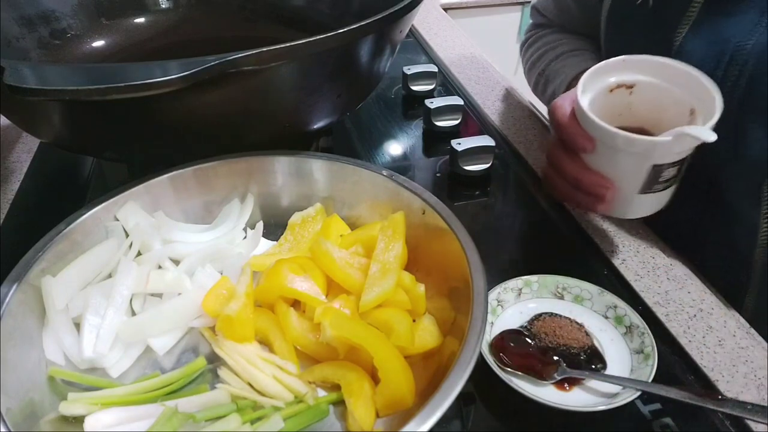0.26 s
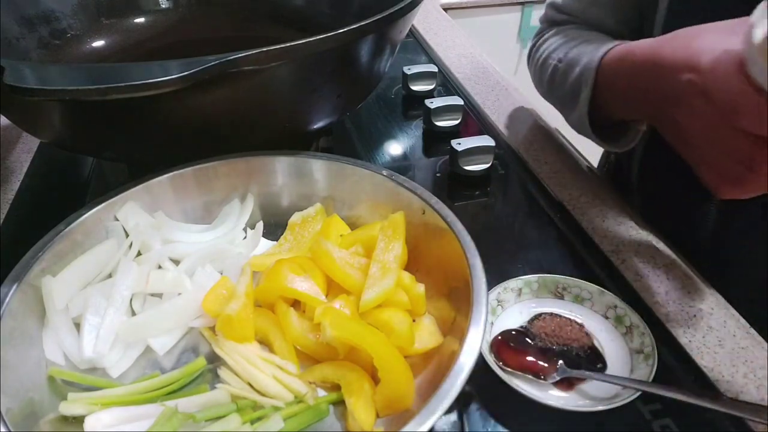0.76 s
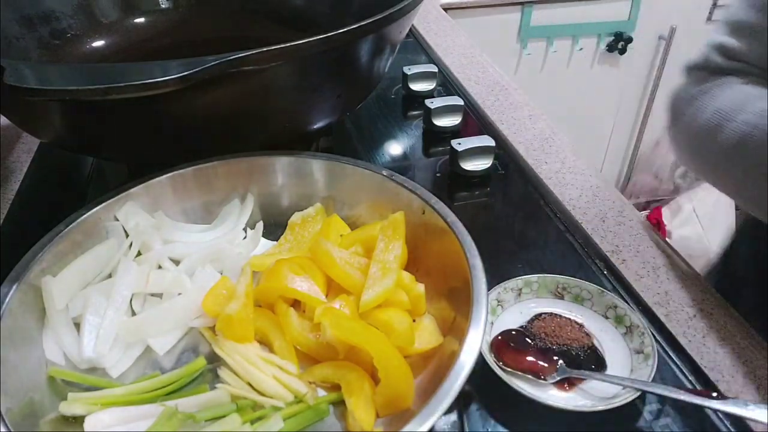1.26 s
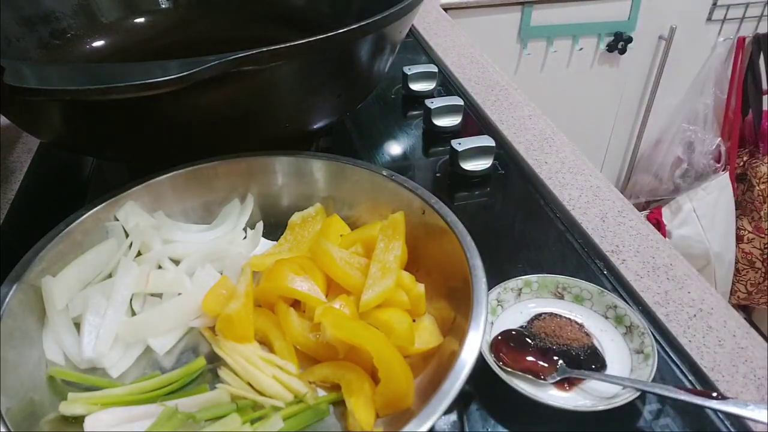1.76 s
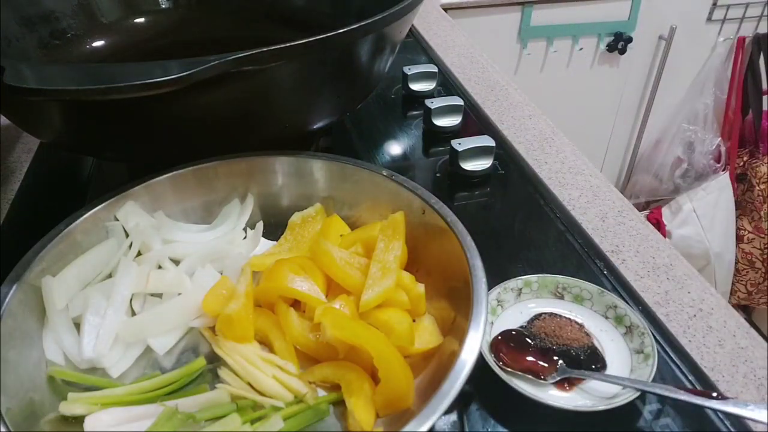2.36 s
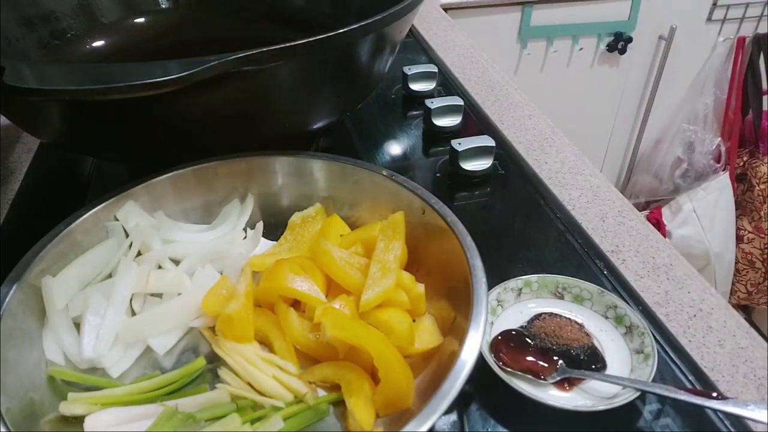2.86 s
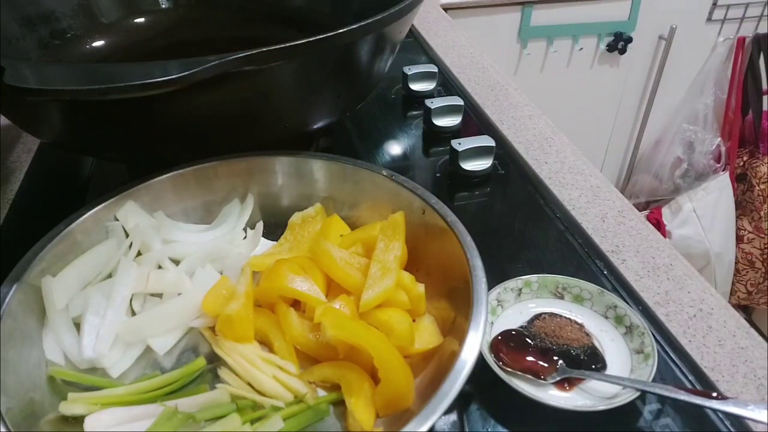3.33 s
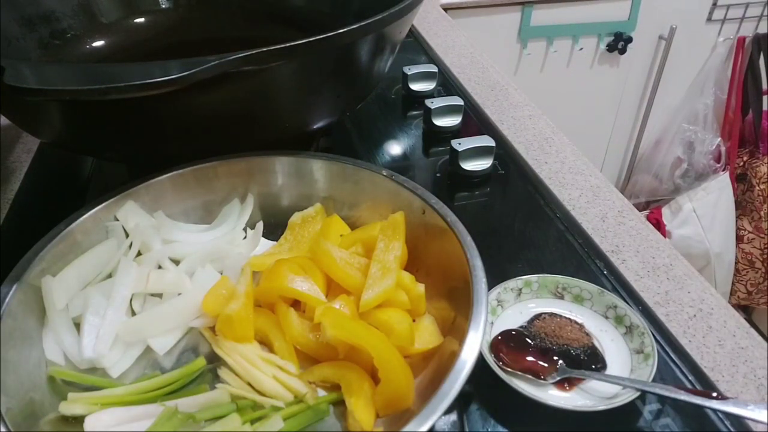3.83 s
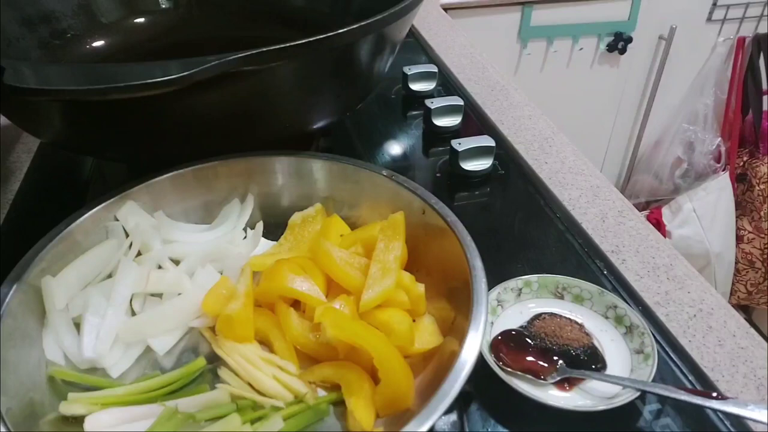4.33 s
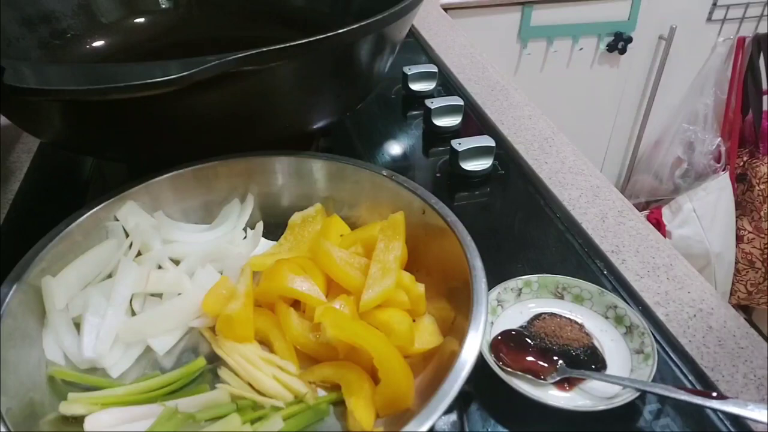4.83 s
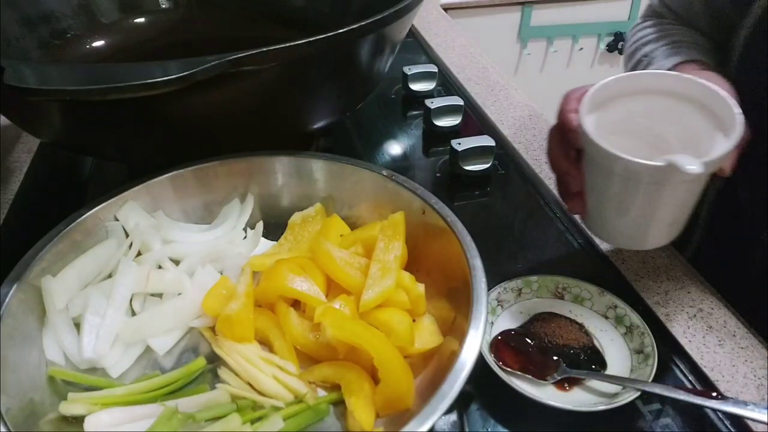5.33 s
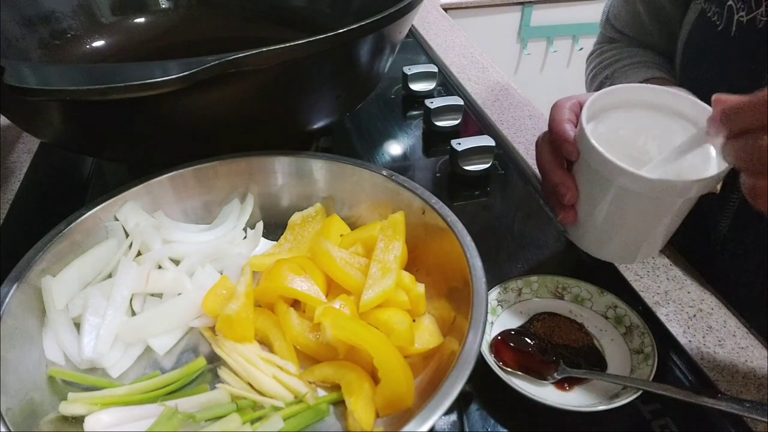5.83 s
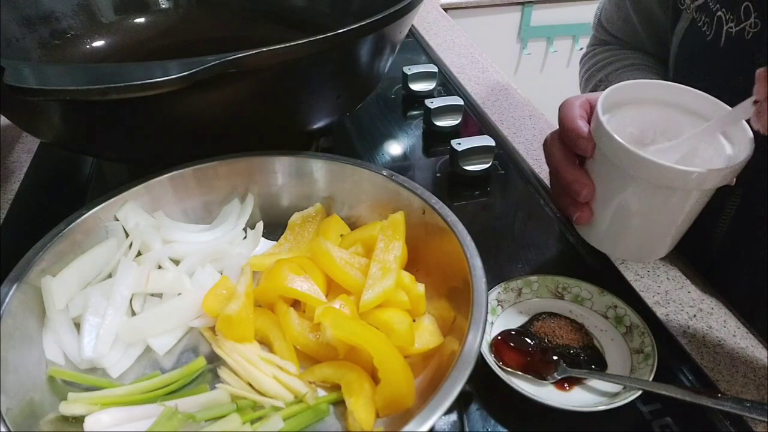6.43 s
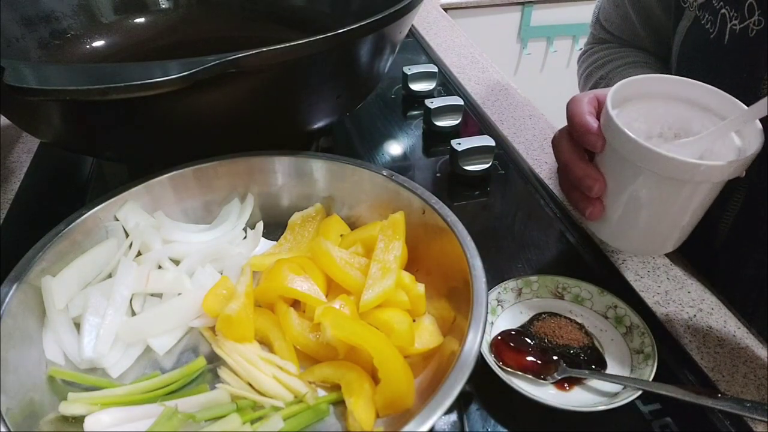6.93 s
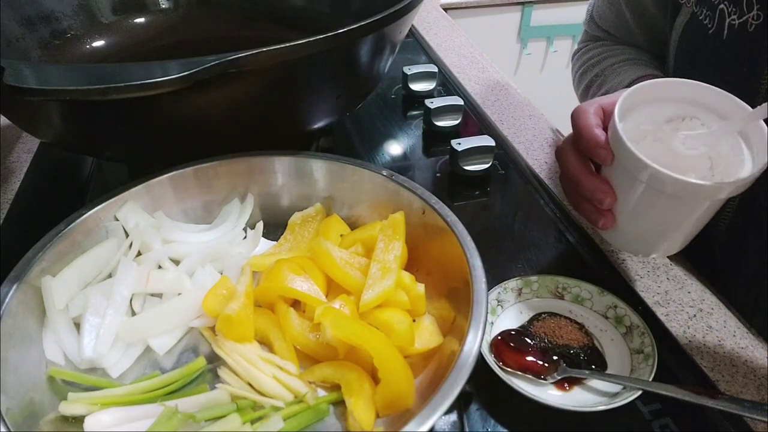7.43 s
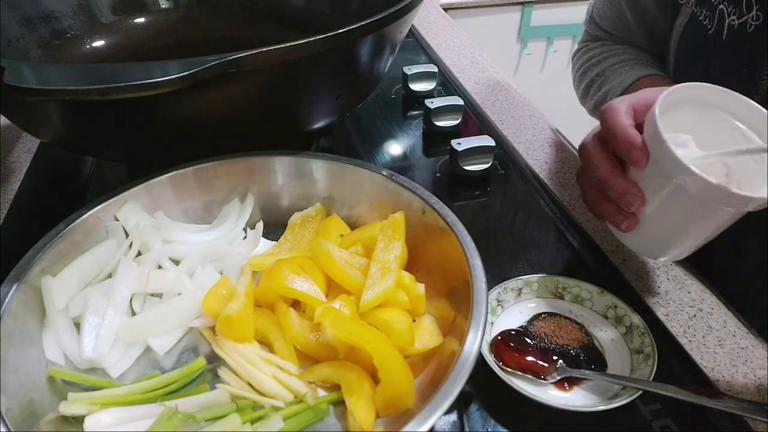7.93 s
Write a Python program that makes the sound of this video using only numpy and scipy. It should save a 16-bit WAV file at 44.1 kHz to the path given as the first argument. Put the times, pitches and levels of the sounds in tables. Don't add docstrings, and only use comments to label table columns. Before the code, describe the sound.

Small tiled kitchen heard from the counter in close stereo, with a faint steady low fan drone. Two sharp, glassy clinks come first, then soft scraping, light jar knocks and a loud ceramic lid seating and snapping home. A cupboard door jolts open, something slides, the door bangs dully, and a jar rattles and lands. Quiet rustles follow, then a single bright spoon tap on a jar and a tiny final tick.

```python
import sys
import numpy as np
from scipy import signal
from scipy.fft import rfft, irfft, next_fast_len
from scipy.io import wavfile
from scipy.ndimage import uniform_filter1d

SR = 44100
rng = np.random.default_rng(int(sys.argv[2]) if len(sys.argv) > 2 else 0)


def transcribe(signal):
    frames = np.atleast_2d(signal).T
    limited = np.clip(frames, -1, 1)
    pcm = np.round(limited * 32767).astype(np.int16)
    wavfile.write(sys.argv[1], SR, pcm)


def attenuation_scalar(level_db):
    decades = np.asarray(level_db, float) / 20
    return 10 ** decades


N = 361161

# (frequency [Hz], density [dB per Hz])
FAN_DRONE = [(22, -32.5), (40, -19.5), (54, -17), (64, 2), (80, -9.5), (100, 3), (113, -5.5), (130, 4.5),
             (200, -22.5), (326, -6.5), (370, -21), (415, -13.5), (550, -26), (750, -23.5), (1700, -40.5),
             (2100, -59.5)]
FAN_AIR = [(1060, -34.5), (1800, -11), (2390, -11), (3510, -8), (3770, -8), (4250, -8.5), (5390, -7),
           (5850, -11), (7630, -9.5), (8440, -8.5), (9420, -9.5), (14900, -8), (16000, -18.5)]
FAN_DB, AIR_DB = -44.5, -73.5
# (frequency [Hz], gain [dB])
FAN_SIDE = [(20, -24.0), (60, -23.5), (125, -15.0), (400, -3.5), (2200, 3.0), (20000, -2)]
# (time [s], level [dB])
FAN_SWELL = [
    (0.0, -51),
    (4.45, -48),
    (8.19, -47),
]
# (frequency [Hz], width [Hz], level [dB])
WHINE = [(8250, 90, -86), (8750, 70, -88), (3850, 80, -90)]

# (frequency [Hz], t60 [s])
ROOM_T60 = [(150, 0.2), (600, 0.2), (2000, 0.23), (6000, 0.253), (14000, 0.21)]
# (frequency [Hz], gain [dB])
ROOM_SIDE = [(20, -27), (250, -7.0), (700, -4.0), (1500, 1.5), (20000, -1.5)]
ROOM_DB, CHINA_ROOM_DB, CUP_ROOM_DB = -5.5, -3, -3
PORT_LAG_S, RING_LAG = .00012, .3

# (loudest time [s], rise [s], fall [s], hiss level [dB], rumble level [dB])
STROKES = [(.25, 0.22, 0.13, -48, -65), (0.368, 0.012, 0.11, -55, -48), (0.6, 0.083, 0.085, -61, -73.5),
           (.765, 0.036, 0.041, -72, -56), (2.05, 0.16, 0.32, -67, -67),
           (2.232, 0.024, 0.085, -59.5, -54.5), (2.606, 0.023, 0.022, -43, -56),
           (2.865, 0.083, 0.054, -56.5, -53.5), (3.209, 0.026, 0.08, -48.5, -56.5),
           (3.945, 0.032, 0.12, -49.5, -49.5), (4.04, 0.1, 0.05, -48.5, -52),
           (4.12, 0.1, 0.064, -45.5, -58), (4.2, 0.11, 0.062, -60.5, -40.5), (4.41, 0.11, 0.12, -59, -87),
           (4.6, 0.085, 0.17, -56, -52), (4.73, 0.068, 0.089, -59, -59), (4.782, 0.013, 0.029, -54, -41),
           (5.2, 1, .25, -65.5, -66), (5.5, 0.04, 0.1, -57.5, -51), (5.555, .04, 0.034, -57.5, -62),
           (5.792, 0.042, .09, -68, -66.5), (7.238, 0.062, 0.092, -62, -69)]
STROKE_DEPTH_DB, STROKE_ROUND = 20.5, 1.45
# (frequency [Hz], density [dB per Hz])
HISS = [(1470, -11.5), (2500, -13), (2970, -17), (3740, -10.5), (5610, -13), (7650, -15.5), (9660, -9.5),
        (13200, -8.5), (14700, -17), (16000, -23)]
RUMBLE = [(300, -8.5), (750, 7.5), (1400, -3.0), (2400, -19.5), (3000, -12.0), (4000, -46.5)]

# (time [s], peak [dB], t60 [s], left minus right [dB])
PATS = [(.362, -40, 0.042, 2), (2.499, -40.5, 0.044, 6.5), (2.597, -42.5, 0.03, 2.5),
        (2.618, -41.5, .02, 1.5), (3.038, -38.5, 0.12, 2), (3.197, -29.5, 0.048, 3.5),
        (4.112, -35, 0.034, 5), (4.15, -42, 0.074, 3), (4.222, -35, 0.028, 4), (1.284, -23, 0.046, 2),
        (1.504, -29, 0.047, -1.5), (4.018, -38, 0.038, 3), (4.03, -41, 0.041, -5),
        (4.563, -34.5, 0.064, 3.5), (4.615, -42, 0.038, -4)]
# (time [s], peak [dB], t60 [s], left minus right [dB])
RATTLE = [(4.097, -24, 0.024, 4), (4.779, -45.5, 0.014, 1), (.374, -28, 0.046, 0), (4.112, -49, .02, -1),
          (4.125, -36, .02, -3), (4.1473, -33.5, .02, 0), (4.163, -41, .02, 8), (4.1733, -37.5, .02, -1),
          (4.192, -42, 0.018, -0.5), (4.208, -39, 0.027, 1), (4.2262, -40, 0.021, -3),
          (4.243, -47, 0.019, 1.5), (7.381, -27, 0.056, 5)]
# (frequency [Hz], density [dB per Hz])
PAT_BODY = [(200, -17), (450, 5.5), (750, 2), (1100, -9.5), (1700, -16.5), (3000, -43)]
RATTLE_BODY = [(400, -7), (750, -0.5), (1500, -3.5), (2300, 3), (3100, 3), (4200, 0.5), (6500, -11),
               (10000, -15.5), (15000, -17)]
# (middle time [s], half length [s], level [dB])
SHELF_GROAN = (4.12, 0.16, -47.5)
# (frequency [Hz], density [dB per Hz])
SHELF_BODY = [(150, 0), (230, -9.5), (300, -6.5), (420, -4.5)]
# (time [s], peak [dB], frequency [Hz], t60 [s], left minus right [dB])
STRAY_RINGS = [(0.244, -36, 3030, 0.083, 0.5), (.297, -45, 3100, 0.088, 2), (.325, -45.5, 3050, 0.09, 6),
               (.518, -58, 3010, 0.07, 7), (0.5273, -48, 3080, 0.075, 9), (0.5496, -59, 3050, 0.054, 2),
               (0.8675, -40, 3120, 0.11, -1.5), (.869, -43.5, 4970, 0.094, 4),
               (1.085, -56.5, 3000, 0.032, 0.5), (1.128, -48, 5090, .06, 1.5), (2.41, -62.5, 2690, .08, 6),
               (3.976, -34.5, 2900, .05, -1), (4.716, -38.5, 2990, 0.19, -4.5),
               (7.3815, -30.5, 7850, 0.077, 7.5)]

# (time [s], peak [dB], t60 [s], left minus right [dB])
CHATTER = [
    (2.633, -24.5, .03, 7.5),
    (2.641, -28.5, .03, 2),
    (2.595, -38.5, 0.049, 0.5),
    (2.606, -43, 0.058, -1.5),
    (.128, -27.5, .04, -1),
    (0.13, -27.5, .05, 2.5),
    (3.954, -38, .02, 4),
    (1.5035, -25, 0.038, -2),
    (1.751, -42, .05, 2.5),
]
# (frequency [Hz], density [dB per Hz])
CHATTER_BODY = [(3000, -24), (4800, -11), (6500, -18.5), (8000, -6.5), (9600, -4), (11000, 1.5),
                (13000, -7.5), (14600, -5.5), (15600, -28)]

# (time [s], peak [dB], hollow note [Hz], crack above peak [dB], left minus right [dB])
KNOCKS = [(0.374, -30.5, 460, -20, 21), (0.8656, -28.5, 1010, -5.5, 8), (1.1052, -25.5, 780, -1.5, 2.5),
          (1.2821, -15.5, 529, -3, -11.5), (1.2914, -15.5, 577, -2, 4), (1.503, -17.5, 477, 8.5, 1),
          (1.7507, -28, 460, -6, -2), (3.038, -37, 546, 2, 4), (4.0942, -28.5, 705, -7.5, 11.5),
          (4.7092, -32, 618, -11, -18)]
# (time [s], peak [dB], frequency [Hz], left minus right [dB])
BUMPS = [(1.1274, -26.5, 738, 10), (1.2404, -35, 520, -10), (2.4982, -36, 280, 4), (2.8294, -33, 315, 6),
         (3.1981, -30, 322, 7), (4.0394, -33, 368, 2), (4.1784, -25, 733, 8), (4.565, -36, 437, -20),
         (4.6144, -49, 503, 3), (5.5124, -34.5, 328, 11)]
# (time [s], clack peak [dB], crack peak [dB], left minus right [dB])
TICKS = [(0.4283, -35.5, -34.5, 0), (0.93, -47, -45.5, 13), (1.1265, -41, -33, 5.5), (1.17, -61, -37, 6),
         (1.475, -48, -41.5, 3.5), (2.23, -51.5, -47.5, 15), (3.197, -69, -42.5, 1.5), (3.954, -36, -33, 5),
         (4.1795, -34, -59.5, 10), (4.7792, -32, -48, 3), (5.495, -54, -36, 5.5),
         (5.513, -59.5, -38.5, 8.5), (7.3808, -37, -51, 11.5), (7.845, -68, -51, 4),
         (8.0532, -41.5, -65, 4.5)]
# (multiple of the note [ratio], level [dB], t60 [s])
WOOD = [(1, 8.5, 0.083), (1.64, -2.5, 0.07), (2.2, -23, 0.021), (.7, -9.5, 0.082)]
# (frequency [Hz], density [dB per Hz])
CLACK = [(600, -31), (1100, -5), (2000, -4.5), (3300, -5), (5000, -49)]
CRACK = [(2200, -22.5), (3200, -8.5), (4600, -1.5), (6300, -12), (8200, -5), (10800, -0.5), (12500, -9.5),
         (14600, -10.5), (15600, -25.5)]
# hits (time [s], peak [dB], left minus right [dB]); colour (frequency [Hz], density [dB per Hz]); t60 [s]
DOOR_PULL = [(2.6235, -6.5, 5), (2.63, -12.5, 1), (2.635, -9.5, 0)], [(88, -43), (150, -25), (315, 2),
             (555, -6), (716, 3.5), (1050, -9), (1500, -7.5), (2100, -17), (3040, -21), (3920, -33.5),
             (6000, -45), (8900, -61), (11300, -52), (14500, -55), (16000, -43.5)], 0.02
DOOR_BANG = [(3.6955, -9, 1.1), (3.7012, -10, 1.83), (3.719, -25.5, 2.9)], [(88, -33), (150, -25),
             (297, -3), (624, -9), (821, -1.5), (1500, -4.5), (1750, -3.5), (2200, -11), (3200, -20.5),
             (4320, -27), (4950, -34), (12200, -42), (15100, -51), (16000, -86.5)], 0.02
LID_ON = [(1.282, -12.5, -1.1), (1.2915, -7.5, 0.5)], [(530, -21.5), (900, -17.5), (1660, -12.5),
          (1790, -17), (2120, -4.5), (2390, -21), (3070, -1.5), (3860, -17.5), (4680, -10.5), (6720, -18),
          (11300, -7.5), (14700, -6), (16000, -26)], 0.044
LID_SNAP = [(1.503, -15, -2.5)], [(530, -34), (900, -29), (1640, -21), (1830, -3), (2630, -14), (3070, 8),
            (3380, -4), (5220, -32), (8000, -8), (11300, -1), (14700, -13.5), (16000, -46)], 0.024
SPOON_TAP = [(7.3816, -22.5, 6.4)], [(530, -29), (900, -35), (1700, -8), (2960, -11), (4300, -17),
             (6410, -21), (7770, 0), (8760, -39.5), (9530, -19), (14900, -36), (16000, -54)], 0.021
SHELF_TAP = [(3.0345, -40, 0.0013)], [(1470, -45), (2500, -13), (4440, 5.5), (6110, -37.5), (6600, -7),
             (10900, -5), (14700, -17), (16000, -34)], 0.12
# (time [s], peak [dB], frequency [Hz])
THUMPS = [
    (2.631, -30, 84.6),
    (3.215, -34, 77),
    (3.7, -32, 157.5),
]
# (time [s], peak [dB], frequency [Hz])
PANEL = [
    (2.623, -14, 301.3),
    (3.7, -16.5, 301),
]
# (time [s], peak [dB], frequency [Hz])
SQUEAKS = [(1.9986, -64, 12650), (3.597, -61.5, 11740), (6.104, -66, 11400), (6.7977, -62, 11560)]

# (time [s], peak [dB], left minus right [dB])
LID_HITS = [
    (1.28, -12, -0.58),
    (1.2912, -1, 0.39),
    (1.504, -5.5, -1.4),
]
JAR_HITS = [
    (4.708, -32.5, -0.42),
    (7.3818, -13.5, 0.79),
]
# (frequency [Hz], level [dB], t60 [s])
LID_MODES = [(3080, 2, 0.1), (4750, -4, 0.058), (8273, -5.5, 0.12), (11200, 0.5, 0.14), (14644, -17, .08)]
JAR_MODES = [(5400, -20, 0.021), (7870, -5, 0.093), (9400, -10, 0.11), (11300, -11, 0.1), (15100, -8, .08)]
# (time [s], peak [dB], frequency [Hz], t60 [s], left minus right [dB])
BEATING_RINGS = [(0.4724, -46, 3020, 0.15, 1), (0.5638, -52, 3100, 0.3, 14), (0.5923, -47.5, 3020, 0.1, 10),
                 (0.931, -42.5, 2860, 0.05, 9), (1.105, -35.5, 3080, 0.23, 2.5), (1.1689, -42, 2985, 0.13, 2),
                 (1.7544, -35, 3092, 0.18, 4.5), (2.627, -27.5, 3070, 0.045, 19),
                 (3.954, -29, 2914, 0.044, 10.5), (4.0965, -23, 3060, 0.018, 2), (4.149, -42, 3040, 0.074, 2),
                 (4.172, -37.5, 2960, 0.045, -6), (4.2273, -45, 2960, 0.05, 3), (4.7094, -23, 2937, 0.088, -5),
                 (7.223, -58.5, 2890, 0.19, 12.5), (7.244, -54.5, 2944, 0.21, 18.5),
                 (8.0528, -41, 2907, 0.11, 9.5)]
# (level [dB], t60 [s])
JAR_NOTE = (7.3812, -21, 9), [(3.5, 0.064), (-10, .22)]
JAR_NOTE_HZ = [2891, 2955]

# (time [s], peak [dB], left minus right [dB], long rim modes [dB])
CLINK_A = [
    (0.0085, -4.5, 5, -0.5),
    (0.0222, -10, 6, -20),
]
CLINK_B = [
    (0.0935, -7.5, 4.0, -7.5),
    (0.112, -6.5, 2, 4),
]
CUP_HZ = [3035, 2990, 4840, 7207, 8215, 9600, 10668, 10736, 10800, 10874, 11200, 11610, 12685, 14210, 14808]
# (level [dB], t60 [s])
CUP_A = [(-2.5, .11), (-8, .2), (0, 0.55), (-8.5, .6), (-17.5, .2), (-8, .2), (-10, .14), (-5.5, .15),
         (-9, .15), (-9, .14), (-10.5, .14), (-19, 0.16), (-14, .2), (-9, .12), (-13, .15)]
CUP_B = [(-6, .27), (-7, .22), (-1, .6), (-8.5, .2), (-14, .3), (-8, .4), (-9.5, .2), (-6, 0.14), (-10, .2),
         (-11.5, 0.2035), (-13.5, .22), (-20.5, 0.25), (-10, .27), (-8, 0.2), (-6, .25)]
# (time [s], t60 from then on [s])
GRIPS = [
    (.074, .03),
    (.172, 0.13),
]
# (frequency [Hz], density [dB per Hz])
SHIMMER = [(500, -37), (1000, -21.5), (2400, -20.5), (3100, -6.5), (4000, -18), (5000, -18), (5600, -41),
           (6500, -39.5), (7100, -26.5), (8000, -16), (9000, -17), (11000, -5.5), (13200, -10), (14600, 0),
           (15500, -20)]
RIM_FROM_HZ, CLEAN_TOP_HZ = 4000, 7900
# (clink time [s], lead [s], gain [dB])
DUCK = (.0925, .014, -14)


def unit(x):
    return x / np.sqrt(np.mean(x ** 2))


def colour(x, points):
    n = 2 * next_fast_len(len(x) // 2 + 1, True)
    hz, db = np.transpose(points)
    f = np.arange(n // 2 + 1) * SR / n + 1
    gain = attenuation_scalar(np.interp(np.log(f), np.log(hz), db, left=-70, right=-70))
    cepstrum = irfft(np.log(gain), n)
    cepstrum[1:n // 2] *= 2
    cepstrum[n // 2 + 1:] = 0
    return irfft(rfft(x, n) * np.exp(rfft(cepstrum)), n)[:len(x)]


def band_noise(points, length=N):
    return colour(rng.standard_normal(length), points)


def fade(t, t60):
    return np.exp(-np.log(1000) * t / t60)


def ring(modes, scatter_db, rough=0., spread=.02, contact_s=0.0006, length=0.29):
    hz, db, t60 = (c[:, None] for c in np.transpose(modes))
    t = np.arange(int(min(length, 2 * np.max(t60)) * SR)) / SR
    luck = rng.standard_normal((7, len(modes), 1))
    tone = np.sin(2 * np.pi * hz * t)
    for k in range(1, 4):
        tone += rough * np.sin(2 * np.pi * hz * (1 + spread * luck[k]) * t + luck[k + 3])
    x = np.sum(attenuation_scalar(db + scatter_db * luck[0]) * fade(t, t60) * tone, axis=0)
    x *= np.clip(t / contact_s, 0, 1)
    return x / np.max(np.abs(x))


def burst(points, t60):
    t = np.arange(8192) / SR
    puff = rng.standard_normal(len(t)) * fade(t, t60) * np.clip(t / 0.00033, 0, 1)
    x = colour(puff, points)
    return x / np.max(np.abs(x))


def add(out, s, x, db, pan_db, lag=0.91):
    for channel, side in enumerate((1, -1)):
        late = side * np.tanh(pan_db / 4.5) * lag * PORT_LAG_S
        i = max(int((s + late) * SR), 0)
        part = x[:N - i]
        out[channel, i:i + len(part)] += part * attenuation_scalar(db + side * pan_db / 2)


def add_bursts(out, hits, points):
    for s, db, t60, pan_db in hits:
        add(out, s, burst(points, t60), db, pan_db)


def walk(rate):
    k = int(SR / rate)
    held = np.repeat(rng.standard_normal(N // k + 1), k)
    return 0.33 * uniform_filter1d(uniform_filter1d(held, k), k)[:N]


def fan():
    s, db = np.transpose(FAN_SWELL)
    swell = np.interp(np.arange(N) / SR, s, db - np.mean(db))
    mid = band_noise(FAN_DRONE)
    side = colour(band_noise(FAN_DRONE), FAN_SIDE)
    drone = (mid + side * np.array([[1], [-1]])) / np.std(mid)
    drone = drone * attenuation_scalar(FAN_DB + 0.93 * swell + np.array([[.8], [-.8]]))
    air = np.array([unit(band_noise(FAN_AIR)) for _ in range(2)]) * attenuation_scalar(AIR_DB + 3.0)
    whine = 0
    for hz, width, level_db in WHINE:
        whine = whine + unit(band_noise([(hz - width, -30), (hz, 0), (hz + width, -30)])) * attenuation_scalar(level_db)
    return drone + air + whine


def even(tail):
    f = rfft(tail)
    power = np.abs(f) ** 2
    level = uniform_filter1d(power, size=700) / uniform_filter1d(power, size=50)
    return irfft(f * np.sqrt(level), len(tail)) * (np.arange(len(tail)) < .4 * SR)


def echo_tail():
    t = np.arange(int(.5 * SR)) / SR
    hz = [10] + [f for f, _ in ROOM_T60] + [22000]
    tail = 0
    for k, (f, t60) in enumerate(ROOM_T60):
        tail = tail + band_noise([(hz[k], -15), (f, 0), (hz[k + 2], -15)], len(t)) * fade(t, t60)
    return even(tail * np.clip(t / .006, 0, 1))


def room():
    mid = echo_tail()
    side = colour(echo_tail(), ROOM_SIDE)
    return np.array([mid + side, mid - side]) / np.sqrt(np.sum(mid ** 2)) * attenuation_scalar(ROOM_DB)


def scrapes():
    t, hiss, rub = np.arange(N) / SR, 0, 0
    for s, rise, fall, hiss_db, rumble_db in STROKES:
        away = np.maximum((s - t) / rise, (t - s) / fall)
        stroke = attenuation_scalar(-STROKE_DEPTH_DB * away ** STROKE_ROUND)
        hiss = np.hypot(hiss, stroke * attenuation_scalar(hiss_db))
        rub = np.hypot(rub, stroke * attenuation_scalar(rumble_db))
    out = []
    for pan_db in (.8, -.8):
        slips = rng.standard_normal(N) * attenuation_scalar(4.6 * walk(90) + 2.49 * walk(400))
        bright = unit(colour(slips, HISS)) * hiss
        rough = unit(colour(slips, RUMBLE)) * rub
        out.append(attenuation_scalar(pan_db - 2.0) * (bright + rough))
    return np.array(out)


def touches():
    out = np.zeros((2, N))
    for s, db, hz, t60, pan_db in STRAY_RINGS:
        add(out, s, ring([(hz, 0, t60)], 0, .6, 0.031, 0.0013), db - 1.0, pan_db, RING_LAG)
    add_bursts(out, PATS, PAT_BODY)
    add_bursts(out, RATTLE, RATTLE_BODY)
    s, half, db = SHELF_GROAN
    shake = unit(band_noise(SHELF_BODY))
    return out + shake * attenuation_scalar(db) * np.exp(-((np.arange(N) / SR - s) / half) ** 4)


def chatter():
    out = np.zeros((2, N))
    add_bursts(out, CHATTER, CHATTER_BODY)
    return out


def knocks():
    out = np.zeros((2, N))
    for s, db, hz, pan_db in BUMPS + [(s, db, hz, p) for s, db, hz, _, p in KNOCKS]:
        body = [(k * hz, g, t60) for k, g, t60 in WOOD]
        add(out, s, ring(body, 2.4, 0.48, 0.05, 0.0015, .1), db - 3.5, 0.41 * pan_db)
    for s, db, crack_db, pan_db in TICKS + [(s, db - 0.5, db + c, p) for s, db, _, c, p in KNOCKS]:
        add(out, s, burst(CLACK, 0.019), db - 0.5, pan_db)
        add(out, s, burst(CRACK, 0.075), crack_db - 4.0, pan_db)
    for hits, points, t60 in (DOOR_PULL, DOOR_BANG, LID_ON, LID_SNAP, SPOON_TAP, SHELF_TAP):
        for s, db, pan_db in hits:
            add(out, s, burst(points, t60), db + 0.5, pan_db)
    for s, db, hz in THUMPS:
        push = [(hz, 0, .3), (2.1 * hz, -6, .15)]
        add(out, s, ring(push, 0, contact_s=0.0053), db + 0.5, 1.5)
    for s, db, hz in PANEL:
        panel = [(hz, 0, .08), (1.237 * hz, -4, .06)]
        add(out, s, ring(panel, 0, 0.34, 0.18, 0.0055), db - 4.5, 1.5)
    for s, db, hz in SQUEAKS:
        add(out, s, burst([(0.85 * hz, -20), (hz, 0), (1.1 * hz, -20)], 0.13), db + 3.5, 0)
    return out


def china():
    out = np.zeros((2, N))
    for hits, modes, trim_db in ((LID_HITS, LID_MODES, -12), (JAR_HITS, JAR_MODES, -16)):
        for s, db, pan_db in hits:
            add(out, s, ring(modes, 4.4, 1.0, 0.0066), db + trim_db, pan_db)
    for s, db, hz, t60, pan_db in BEATING_RINGS:
        pair = [(hz, 0, t60), (hz + 62, -4, 0.43 * t60)]
        add(out, s, ring(pair, 2.0, .7, 0.015, 0.00098), db, pan_db, RING_LAG)
    return out


def jar_note():
    out = np.zeros((2, N))
    (s, db, pan_db), drive = JAR_NOTE
    modes = [(hz, g, t60) for hz, (g, t60) in zip(JAR_NOTE_HZ, drive)]
    add(out, s, ring(modes, 0, contact_s=.0008), db, pan_db, RING_LAG)
    return out


def cup():
    out, t = np.zeros((2, N)), np.arange(N) / SR
    for hits, drive, (grip_s, held_t60) in zip((CLINK_A, CLINK_B), (CUP_A, CUP_B), GRIPS):
        modes = [(hz, g, t60) for hz, (g, t60) in zip(CUP_HZ, drive)]
        high = [m for m in modes if m[0] > CLEAN_TOP_HZ]
        for s, db, pan_db, rim_db in hits:
            low = [(hz, g + rim_db * (hz > RIM_FROM_HZ), t60) for hz, g, t60 in modes if hz < CLEAN_TOP_HZ]
            add(out, s, ring(low, .4, 0.12, 0.006, length=.4), db - 5.0, pan_db + 2, RING_LAG)
            add(out, s, ring(high, 0.7, 0.4, .004, length=.4), db - 2.5, pan_db - 3.0, RING_LAG)
            add(out, s, burst(SHIMMER, 0.17), db - 8, pan_db - 3.5)
        out *= fade(np.maximum(t - grip_s, 0), held_t60)
    return out


def scene():
    floor, tails = fan(), room()
    near = scrapes() + touches() + chatter() + knocks()
    glazed = china() + jar_note()
    close = cup()
    sent = near + attenuation_scalar(CUP_ROOM_DB) * close + attenuation_scalar(CHINA_ROOM_DB) * glazed
    echoes = signal.fftconvolve(sent.mean(axis=0)[None], tails, axes=1)[:, :N]
    heard = near + close + glazed + echoes
    s, lead, db = DUCK
    ahead = s - np.arange(N) / SR
    return heard * attenuation_scalar(db * np.exp(-(ahead / lead) ** 2) * (ahead > 0)) + floor


def low_pass(x):
    return signal.sosfilt(signal.butter(12, 15900, fs=SR, output="sos"), x)


def record(dry):
    rounded = np.tanh(.7 * dry) / 0.69
    top = signal.ellip(6, .3, 25, 15400, fs=SR, output="sos")
    mix = signal.sosfilt(top, rounded)
    return low_pass(mix)


dry = scene()
out = record(dry)
transcribe(out)
```